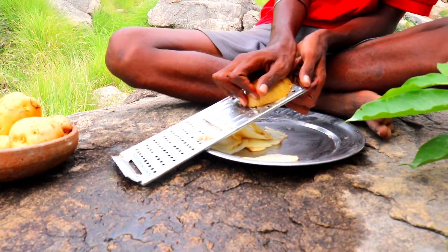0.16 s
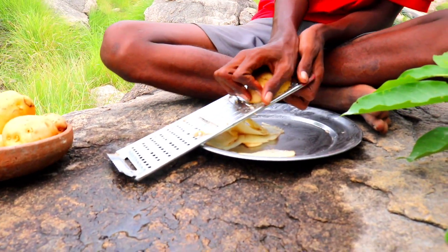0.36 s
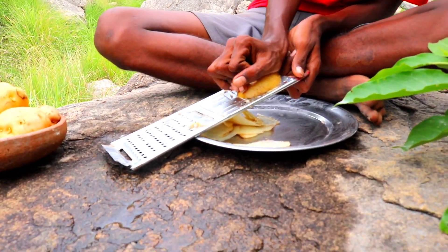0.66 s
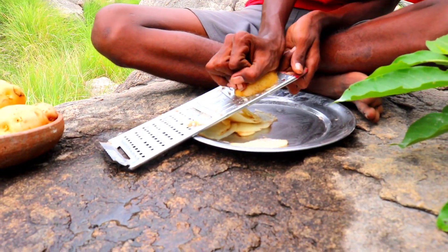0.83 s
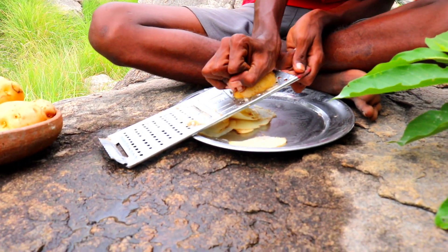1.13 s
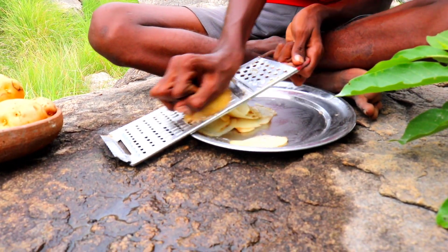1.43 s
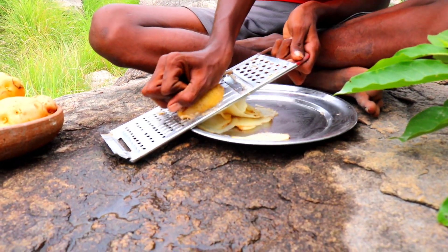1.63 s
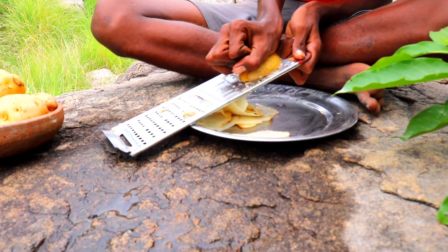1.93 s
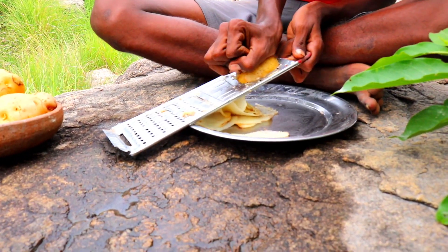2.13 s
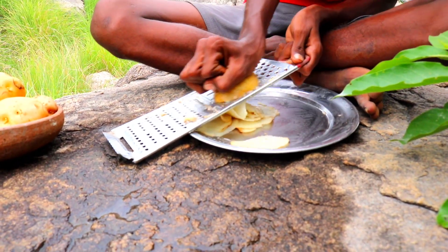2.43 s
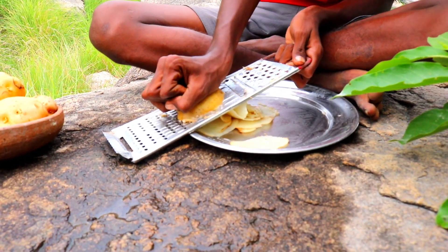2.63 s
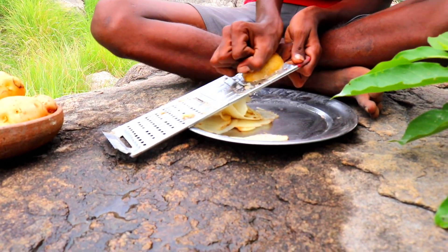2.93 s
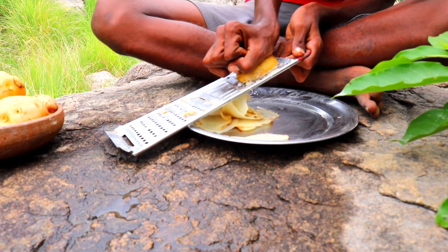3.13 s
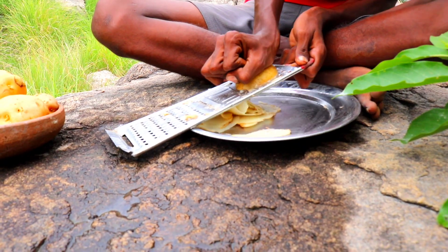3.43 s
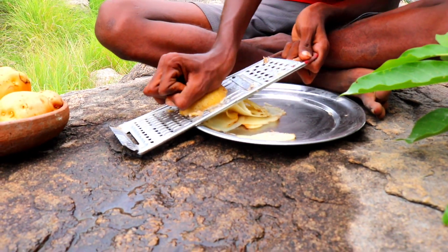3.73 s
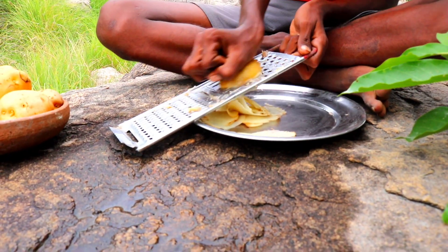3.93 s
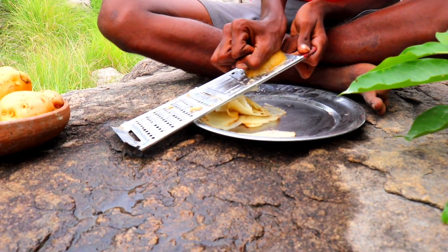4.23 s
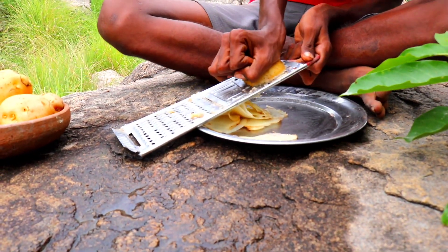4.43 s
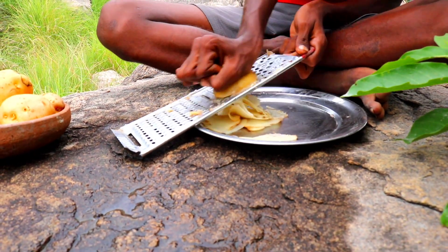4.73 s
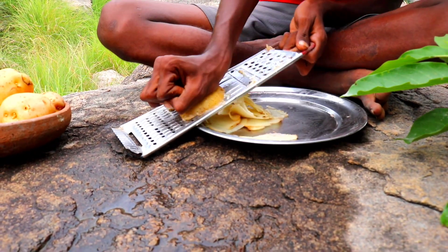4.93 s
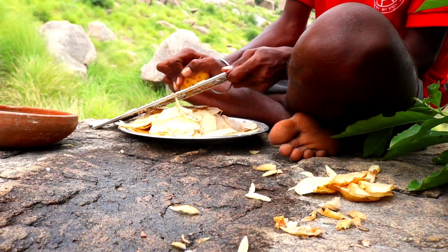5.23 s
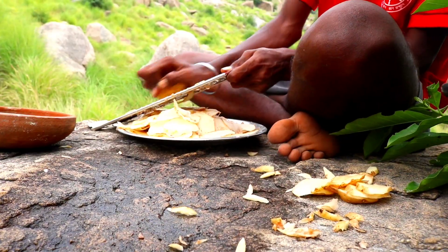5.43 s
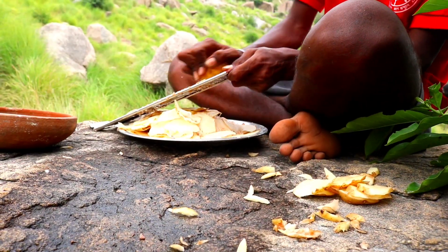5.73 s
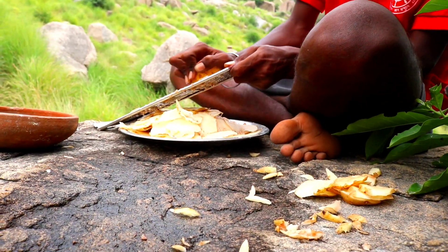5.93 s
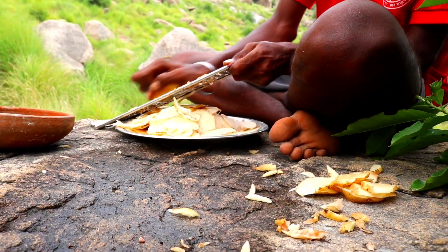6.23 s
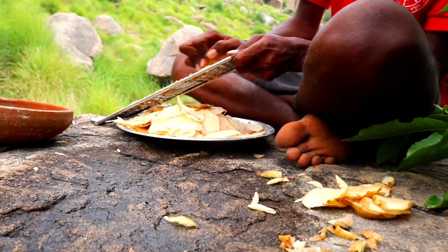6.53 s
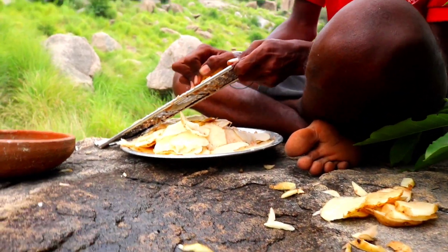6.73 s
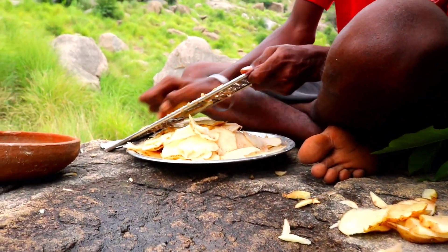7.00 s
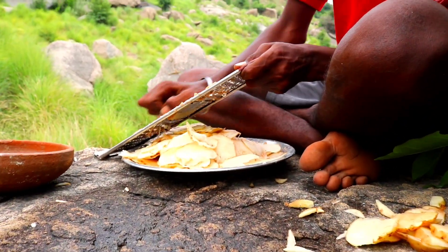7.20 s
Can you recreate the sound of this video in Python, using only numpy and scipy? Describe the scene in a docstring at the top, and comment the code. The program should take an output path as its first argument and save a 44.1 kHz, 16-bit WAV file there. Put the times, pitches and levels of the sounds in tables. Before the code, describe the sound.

Uneven slicing strokes on thin punched steel, about one a second, each leaning in, biting with a crunchy tear and sliding back with a ringing rub. Hard metallic clanks and short rattles from the plate dominate until about five seconds. Then a momentary dropout and a change to damped, moist slicing over a heap, with crisp snaps, dull hand bumps, rock ticks and a light low breeze. Close microphone, open air, no echo.

```python
"""A potato is sliced on a steel slicer that leans across a metal plate on a rock outdoors.
The blade bursts cells as filtered grains; rubs over the punched holes ring the sheet and squeak.
The slicer knocks and chatters on the plate as decaying modes, and torn flesh snaps as noise and plucked modes.
After a moment of silence the slicing goes on over a heap of slices, with wet slides and no more clatter.
Foot taps, hand bumps, faint smacks, open air, a later breeze and a far bird fill in as shaped noise and tones."""
import sys
import numpy as np
from scipy import signal
from scipy.fft import rfft, irfft, next_fast_len
from scipy.io import wavfile
from scipy.ndimage import uniform_filter1d, map_coordinates

SR = 44100
rng = np.random.default_rng(int(sys.argv[2]) if len(sys.argv) > 2 else 0)


def store_pcm(level_fs):
    """Save levels as 16-bit WAV."""
    pcm = np.round(np.clip(level_fs, -1, 1) * 32767).astype(np.int16)
    wavfile.write(sys.argv[1], SR, np.atleast_2d(pcm).T)


N = 324576
TIME = np.arange(N) / SR

# moment of silence: start_s, end_s
SILENCE_S = (5.147, 5.171)
# slicer knocks on the plate, then chatters; body and edge relative to the knock:
# start_s, level_db, body_db, edge_db, main_ring_hz, chatter_db, chatter_s
KNOCKS = [(0.5106, -14, -13, -3.5, 1380, -23, 0.021), (1.7602, -2.5, -33, -30, 1526, -16.5, 0.011),
          (1.9521, -3.5, -20.5, -21, 1487, -23.5, 0.053), (2.2094, -13.5, -15, -22, 1430, -27, 0.01),
          (2.2698, -13, -12, -10, 1470, -27, 0.022), (2.4994, -3, -29, -14, 1630, -12.5, 0.023),
          (2.612, -21, -8, -16, 1490, -29, 0.041), (2.7048, -11.5, -32, -37, 1690, -28, 0.0075),
          (2.796, -15.5, -17, -10, 1400, -33, 0.073), (2.8553, 3, -29, -19.5, 1540, -16.5, 0.046),
          (3.2969, -23.5, -10.5, -0.5, 1530, -35, 0.093), (3.3709, -11.5, -11.5, -25, 1490, -28.5, 0.033),
          (3.6075, 4, -27.5, -14, 1527, -21.5, 0.071), (3.7347, 0.5, -24.5, -17, 1545, -17.5, 0.075),
          (3.8938, 0, -21, -21, 1535, -12.5, 0.041), (4.4572, -23, -7, -0.5, 1480, -35.5, 0.034),
          (4.493, -24, -13, -15, 1490, -29, 0.095), (4.532, -16, -16, -14, 1640, -24, 0.037),
          (4.649, -30.5, -7, -29, 1650, -45, .012), (4.8982, -3.5, -22, -12.5, 1650, -27, 0.13),
          (4.982, -3, -17.5, -14, 1385, -17, .01), (4.9906, -10, -31, -25, 1510, -22.5, 0.064),
          (5.0809, -10.5, -17.5, -13, 1550, -25.5, 0.011)]
# colour of steel on plate: hz, level_db
CLATTER = [(40, -78), (120, -28), (200, -11.5), (310, -21.5), (450, -2), (700, -28), (1200, -13.5),
           (1480, 7.5), (1800, -5.5), (2200, 1), (2600, -4.5), (3700, -23.5), (7200, -35), (15000, -85)]
# colour of tearing, wet flesh: hz, level_db
CRISP = [(180, -76), (300, -14.5), (1140, -6.5), (1560, 0.5), (2320, 3.5), (3030, -1), (3400, -3),
         (4590, -1), (5160, -5), (5700, 1), (9550, -2), (16000, -11)]
# resonances of the thin sheet and punched edges: hz, width_hz, level_db
SHEET = [(563, 10, 1), (887, 13, -1.5), (1569, 19, 14), (1690, 90, -26), (3520, 23, 2), (4307, 74, 17),
         (4730, 300, 4), (5110, 46, 18.5), (6500, 55, 11.5), (6270, 45, 9.5), (6950, 93, 14.5),
         (7710, 25, 15.5), (9570, 40, 12)]
# left-right correlation: hz, correlation
ALIKE = [(100, 0.99), (500, 1), (1200, 0.84), (2200, 0.58), (3500, 0.39), (6000, 0), (12000, 0.017)]


def amp(db):
    """Decibels to gain."""
    return 10 ** (np.asarray(db) / 20)


def unit(x):
    """Scale to rms 1."""
    return x / np.sqrt(np.mean(x ** 2) + 1e-20)


def peaked(x):
    """Scale to peak 1."""
    return x / np.abs(x).max()


def dying(t, t60_s):
    """Exponential decay, 60 dB down after t60_s."""
    return amp(-60 * t / t60_s)


def ramp(t, length_s):
    """Smooth step from 0 at t = 0 to 1 at t = length_s."""
    return np.sin(np.pi / 2 * np.clip(t / length_s, 0, 1)) ** 2


def add(track, start_s, sound):
    """Mix a sound in at start_s, cut off at the end of the track."""
    room = track[:, round(start_s * SR):][:, :sound.shape[-1]]
    room += sound[..., :room.shape[1]]


def along(points, hz):
    """Interpolate (hz, value) points on a log frequency axis."""
    f, v = np.transpose(points)
    return np.interp(np.log(hz + 1), np.log(f + 1), v)


def filtered(x, response):
    """Multiply the spectrum of x by a response of frequency."""
    size = x.shape[-1]
    padded = next_fast_len(size + 8192)
    spectrum = rfft(x, padded) * response(np.fft.rfftfreq(padded, 1 / SR))
    return irfft(spectrum, padded)[..., :size]


def coloured(x, colour, size=2048):
    """Minimum-phase filter with the given (hz, level_db) shape, from its folded cepstrum."""
    cepstrum = irfft(np.log(amp(along(colour, np.fft.rfftfreq(size, 1 / SR)))))
    cepstrum[1:size // 2] *= 2
    cepstrum[size // 2 + 1:] = 0
    impulse = irfft(np.exp(rfft(cepstrum)))
    return signal.fftconvolve(x, impulse[None], axes=1)[:, :x.shape[1]]


def resonances(modes, f):
    """Causal response of (hz, width_hz, level_db) resonances."""
    return sum(amp(db) * 1j * f * w / (c * c - f * f + 1j * f * w) for c, w, db in modes)


def thin(x):
    """High-pass at 150 Hz: the knocks, chatter and snaps carry no deep bass."""
    return signal.sosfilt(signal.butter(3, 150, "high", fs=SR, output="sos"), x)


def noise(size, alike=ALIKE):
    """White stereo noise with a left-right correlation set over frequency by mixing mid and side."""
    def mid_side_gains(hz):
        turn = np.arccos(np.clip(along(alike, hz), -1, 1)) / 2
        return np.array([np.cos(turn), np.sin(turn)])
    mid, side = filtered(rng.standard_normal((2, size)), mid_side_gains)
    return np.array([mid + side, mid - side])


def grains(rate_hz, life_s, spread_db, alike=ALIKE):
    """Random noise bursts of random size; the power of each falls to 1/e in life_s."""
    kicks = (rng.random(N) < rate_hz / SR) * amp(spread_db * rng.standard_normal(N)) ** 2
    power = signal.lfilter([1], [1, -np.exp(-1 / (life_s * SR))], kicks)
    return unit(noise(N, alike) * np.sqrt(power))


def crackle(rate_hz):
    """Single sharp clicks as the coarser fibres part, each decaying with a 0.4 ms time constant."""
    clicks = 1.0 * (rng.random(N) < rate_hz / SR)
    envelope = signal.lfilter([1], [1, -np.exp(-1 / (.0004 * SR))], clicks)
    return unit(noise(N) * envelope)


def shifting(x, depth_db):
    """The colour shifts in patches as the potato covers different parts of the sheet."""
    z = signal.stft(x, nperseg=512)[2]
    field = uniform_filter1d(rng.standard_normal(z.shape[1:]), size=4, axis=0)  # across frequency
    field = uniform_filter1d(field, size=12, axis=1)  # across time
    return unit(signal.istft(z * amp(depth_db * unit(field)), nperseg=512)[1][:, :N])


def wobble(rate_hz):
    """A smooth random curve through rate_hz knots a second."""
    return map_coordinates(rng.standard_normal(N // 50), [TIME * rate_hz])


def swells(rows):
    """Gain over time from bell-shaped (centre_s, level_db, sigma_s) swells."""
    return sum(amp(db) * np.exp(-.5 * ((TIME - s) / sigma) ** 2) for s, db, sigma in rows)


def presses(rows):
    """Gain of (peak_s, level_db, rise_s, fall_s) rubs that swell to their hardest press and fade."""
    swell_db = 28  # gained over rise_s, lost over fall_s
    gains = []
    for s, db, rise, fall in rows:
        distance = np.maximum((s - TIME) / rise, (TIME - s) / fall).clip(0, 10)
        gains.append(amp(db - swell_db * distance))
    return np.max(gains, axis=0)


def outdoors():
    """Still open air as coloured noise; after the silence a low breeze of noise lumps gusts once."""
    # colour of the open air: hz, level_db
    air_colour = [(15, -63), (25, -10), (157, -1.5), (489, -5), (545, -3), (695, -6), (775, -7), (1290, -7),
                  (1610, -8), (1790, -7.5), (2000, -10), (3160, -13.5), (4370, -14.5), (16000, -27)]
    # gust: centre_s, level_db, sigma_s
    gust = [(5.26, -45.5, 0.11)]
    air_db, later_air_db, breeze_db = -48, -47.5, -57.5
    air = unit(coloured(noise(N, [(50, 0.71), (400, 0.6), (2000, 0.057), (8000, 0.14)]), air_colour, size=8192))
    lumps = grains(rate_hz=110, life_s=.02, spread_db=1.5, alike=[(100, .3)])
    rumble_colour = [(20, -31), (60, 2.5), (100, 1.5), (150, -4), (220, -7.5), (500, -31)]
    rumble = unit(coloured(lumps, rumble_colour, size=8192))
    later = TIME > SILENCE_S[1]
    breeze = amp([[-4], [2]]) * rumble * later * (amp(breeze_db) + swells(gust))
    return air * amp(np.where(later, later_air_db, air_db)) + breeze


def bird():
    """A far bird gives two faint, slightly falling whistles: sines gliding down."""
    # whistles: centre_s, level_db
    chirps = [(0.753, -50), (1.124, -45.5)]
    pitch_hz, fall_hz_per_s, sigma_s = 1790, 2800, .016
    out = 0
    for s, db in chirps:
        t = TIME - s
        out = out + swells([(s, db, sigma_s)]) * np.sin(2 * np.pi * (pitch_hz - fall_hz_per_s * t / 2) * t)
    return out


def ticking():
    """The wet potato gives faint smacks under the fingers even between strokes: sparse noise grains."""
    smacks = grains(rate_hz=10, life_s=.005, spread_db=2.5)
    return amp(-60.5) * unit(coloured(smacks, CRISP))


def bumping():
    """Dead contacts of a few cycles: a tick from the foot on the rock, a low push from the hand."""
    # slicer's foot on the rock: start_s, level_db, pitch_hz
    taps = [(5.813, -23, 1430), (6.706, -20.5, 3050), (6.818, -15.5, 2660), (6.8214, -22, 2640),
            (6.825, -19.5, 2230), (6.8694, -17, 1560)]
    # soft bumps of the hand on the slicer: start_s, level_db
    bumps = [(5.812, -30), (6.51, -37), (6.821, -32), (6.869, -12.5)]
    grit_colour = [(600, -7), (1500, -8), (4200, -3), (6000, -23)]
    out, t = np.zeros((2, N)), np.arange(SR // 10) / SR

    def thud(hz, decay_s):
        return peaked(t ** 2 * np.exp(-t / decay_s) * np.sin(2 * np.pi * hz * t))

    for s, db, hz in taps:
        grit = peaked(coloured(noise(len(t)) * dying(t, 0.018), grit_colour))
        tap = peaked(thud(hz, decay_s=0.0004) + amp(1.5) * grit)
        add(out, s, amp(db) * amp([[-2], [1]]) * tap)
    for s, db in bumps:
        add(out, s, amp(db) * amp([[-6], [3]]) * thud(hz=400, decay_s=0.00064))
    return out


def ring(t, scatter_db, spread_rad):
    """Steel modes; every contact draws new strengths, tunings and phases, the phases per channel."""
    # slicer and plate together, before any further damping by the caller: hz, level_db, t60_s
    steel_modes = [(404, -33, 0.12), (417, -36, 0.035), (542, -19, 0.043), (787, -5, 0.54), (960, -8, 0.29),
                   (974, -29, .2), (1054, 17, 0.052), (1340, 6, 0.088), (1481, 25, 0.53), (1507, 17, 0.23),
                   (1672, 16.5, 0.2), (2060, 26, 0.18), (2130, 11.5, 0.15), (2553, 17, 0.18),
                   (2544, -10, 0.11), (3340, 2.5, 0.15)]
    detune = .012  # relative, standard deviation
    hz, db, t60 = np.transpose(steel_modes)[:, :, None]
    hz = hz * (1 + detune * rng.standard_normal(hz.shape))
    strength = amp(db + scatter_db * rng.standard_normal(hz.shape) - 60 * t / t60)
    phase = spread_rad * np.sqrt(hz / hz.max()) * rng.standard_normal((2, len(hz), 1))
    return (strength * np.sin(2 * np.pi * hz * t + phase)).sum(axis=1)


def skidding():
    """After a knock a quick irregular train of tiny blows keeps the steel ringing."""
    rise_s, sag_db, dies_db_per_s = 0.012, 5.5, 525  # builds up, sags over its length, dies away
    tone_db, rattle_db = -2, -7  # ringing modes, dry rattle
    blows = shifting(grains(rate_hz=700, life_s=.0009, spread_db=3), depth_db=2.5)
    rattle = unit(coloured(blows, CLATTER))
    out, t = np.zeros((2, N)), np.arange(SR // 4) / SR
    for s, *_, db, length in KNOCKS:
        part = round(s * SR) + np.arange(len(t))
        steel = ring(t, scatter_db=2.5, spread_rad=.45) * dying(t, .12)
        tone = unit(signal.fftconvolve(blows[:, part], steel, axes=1)[:, :len(t)])
        loss_db = sag_db * np.minimum(t / length, 1) + dies_db_per_s * np.maximum(t - length, 0)
        chatter = amp(tone_db) * tone + amp(rattle_db) * rattle[:, part]
        add(out, s, ramp(t, rise_s) * amp(db - loss_db) * chatter)
    return out


def knocking():
    """Each blow is a hard clack with rebounds, a buzz and a short ring pitched by the point of contact."""
    # colour of the bright edge: hz, level_db
    edge_colour = [(1500, -43), (2800, 3), (4500, 8), (7000, 7), (10000, -2.5), (15000, -46)]
    body_colour = [(40, -43), (220, -20.5), (520, 9.5), (700, -1), (1500, -33)]
    edge_rise_s = 0.0016  # wet flesh softens the start
    steel_db, main_db, buzz_db = -4, -13, -9
    partner_ratio = 1.43  # second tone over the main ring
    out, t = np.zeros((2, N)), np.arange(SR // 5) / SR
    for s, db, body_db, edge_db, hz, *_ in KNOCKS:
        contacts = np.zeros((2, len(t)))
        gaps_s = rng.uniform(.0011, .0022, size=6)
        contact_s = np.cumsum(gaps_s) - gaps_s[0]
        contacts[:, np.round(contact_s * SR).astype(int)] = .68 ** np.arange(6)
        clack = peaked(coloured(contacts, CLATTER))
        buzz = peaked(coloured(noise(len(t)) * dying(t, .04), CLATTER))
        edge = peaked(coloured(noise(len(t)) * ramp(t, edge_rise_s) * dying(t, 0.086), edge_colour))
        body = peaked(coloured(noise(len(t), [(400, 0.98)]) * dying(t, 0.094), body_colour))
        steel = peaked(ring(t, scatter_db=3, spread_rad=.5) * dying(t, .2))
        main = np.sin(2 * np.pi * hz * t) + np.sin(2 * np.pi * partner_ratio * hz * t)
        main = main * dying(t, .05)
        metal = peaked(clack + amp(steel_db) * steel + amp(main_db) * main + amp(buzz_db) * buzz)
        add(out, s, amp(db) * (metal + amp(edge_db) * edge + amp(body_db) * body))
    return np.tanh(out)  # the hardest blows saturate


def snapping():
    """Flesh catches and tears off a steel edge with a bright crackle and plucks the sheet's modes."""
    # snaps: start_s, level_db, crackle_t60_s
    snaps = [(0.5112, -26.5, 0.57), (0.6569, -26, 0.081), (0.7721, -28, 0.075), (0.8539, -26.5, 0.12),
             (0.9298, -28, 0.037), (0.9727, -22, 0.11), (1.4484, -9.5, 0.047), (1.493, -8.5, 0.068),
             (1.5148, -10, 0.032), (1.5623, -19.5, 0.15), (1.827, -26, 0.12), (2.0683, -21, 0.094),
             (2.0765, -17, 0.045), (2.2468, -16.5, 0.16), (2.8866, -16.5, 0.093), (3.689, -8.5, 0.14),
             (3.9636, -24, 0.077), (4.458, -27, 0.6), (4.6943, -22, 0.066), (4.7165, -25, 0.023),
             (4.7375, -14.5, 0.033), (4.8968, -4.5, 0.024), (4.932, -19, 0.052), (5.0788, -11, 0.028),
             (5.1883, -12.5, 0.16), (5.5214, -11.5, 0.063), (5.5883, -20.5, 0.12), (5.6405, -26, 0.17),
             (5.871, -26.5, 0.15), (6.001, -18.5, 0.048), (6.304, -14, 0.027), (6.7573, -15, 0.05),
             (7.087, -14, 0.17), (7.1505, -12, 0.027)]
    pan_db = 1.3  # L-R
    out, t = np.zeros((2, N)), np.arange(SR // 6) / SR
    hz, width, level = np.transpose(SHEET)[:, :, None]
    for s, db, t60 in snaps:
        burst = noise(len(t)) * dying(t, t60) * (1 - np.exp(-t / 0.0012))
        phase = hz / 3000 * rng.standard_normal((2, len(hz), 1))  # high modes differ most between channels
        modes = amp(level) * np.exp(-np.pi * width * t) * np.sin(2 * np.pi * hz * t + phase)
        pluck = unit(modes.sum(axis=1))
        pluck_db = -2 if s < SILENCE_S[0] else -9  # the heap of slices damps the sheet later on
        snap = peaked(unit(coloured(burst, CRISP)) + amp(pluck_db) * pluck)
        add(out, s, amp(db) * amp([[pan_db / 2], [-pan_db / 2]]) * snap)
    return out


def sliding():
    """The wet cut face squelches and ticks over the heap while the hand shifts its grip in low rustles."""
    # wet slides: peak_s, level_db, rise_s, fall_s
    slides = [(5.192, -30.5, 0.036, 0.054), (5.824, -29, 0.024, 0.052), (6.02, -32.5, 0.13, 0.04),
              (6.5, -37.5, 0.14, 0.16), (6.62, -39, 0.16, 0.073), (6.757, -35.5, 0.19, 0.18),
              (7.21, -35, 0.067, 0.081), (7.272, -28.5, 0.074, 0.078)]
    # grip rustles: centre_s, level_db, sigma_s
    grips = [(5.825, -44, 0.0055), (6.32, -45, 0.023), (6.51, -40.5, 0.031)]
    # colour of the wet face: hz, level_db
    wet_colour = [(180, -9), (300, -8), (994, -9.5), (1610, -1.5), (2480, -3), (2980, 3.5), (3640, -4.5),
                  (9710, -8), (14200, -17), (16000, -34)]
    grains_wet = grains(rate_hz=3600, life_s=0.0086, spread_db=4.5)
    wet = shifting(grains_wet, depth_db=3) + amp(-5.5) * crackle(rate_hz=220)
    grip = unit(coloured(noise(N), [(60, -15), (200, 2), (550, 0.5), (800, -5), (1500, -35)]))
    return presses(slides) * unit(coloured(wet, wet_colour)) + swells(grips) * grip * amp([[-3], [1]])


def squeaking():
    """At a hard press the potato sticks and slips at one pitch, and the punched edges sing along."""
    # squeaks: centre_s, level_db, sigma_s, pitch_hz
    squeaks = [(0.515, -29, 0.0037, 5160), (0.932, -22.5, 0.0029, 5210), (0.976, -34, 0.0071, 3430),
               (3.058, -28.5, 0.0063, 5100), (3.149, -19, 0.01, 4960), (4.207, -30.5, .008, 1830),
               (4.213, -28, 0.01, 4600), (4.315, -26, 0.0089, 3320)]
    # resonances of the punched edges: hz, width_hz, level_db
    tines = [(4220, 44, -7), (4800, 150, -1), (5260, 36, -3)]
    width_hz, tines_db = 30, -1
    out, t = np.zeros((2, N)), np.arange(-SR // 10, SR // 10) / SR
    for s, db, sigma, hz in squeaks:
        slips = noise(len(t), [(2000, 0.56), (5000, -0.89)])
        note = unit(filtered(slips, lambda f: resonances([(hz, width_hz, 0)], f)))
        edges = unit(filtered(slips, lambda f: resonances(tines, f)))
        add(out, s + t[0], amp(db) * np.exp(-.5 * (t / sigma) ** 2) * (note + amp(tines_db) * edges))
    return out


def rubbing():
    """Stick and slip as the potato is drawn back over the punched holes rings the sheet."""
    # rubs: peak_s, level_db, rise_s, fall_s
    rubs = [(.932, -29, 0.031, 0.042), (.978, -34.5, 0.06, 0.05), (1.745, -31, 0.062, 0.042),
            (1.952, -33, 0.16, 0.078), (2.255, -34.5, 0.0082, 0.21), (2.31, -33.5, 0.049, 0.088),
            (3.066, -32.5, 0.15, 0.15), (3.15, -33.5, 0.054, 0.076), (3.32, -33.5, 0.015, 0.12),
            (3.395, -31, 0.07, 0.057), (4.08, -47, .06, 0.21), (4.206, -32, 0.07, 0.046),
            (4.31, -31.5, 0.072, 0.09)]
    # colour of the punched steel: hz, level_db
    punched_colour = [(200, -21), (550, -8), (1100, -16), (1800, -3.5), (2500, -4), (3300, -3.5),
                      (3800, -8), (4400, -14), (5300, -4), (5900, -2.5), (6500, -15), (8000, -9.5),
                      (11000, -11.5), (15500, -12)]
    slips = shifting(grains(rate_hz=1200, life_s=.002, spread_db=3.5), depth_db=2)
    sheet = unit(filtered(slips, lambda f: resonances(SHEET, f)))
    return presses(rubs) * (amp(2) * unit(coloured(slips, punched_colour)) + amp(-3.0) * sheet)


def pushes():
    """Gains of hiss and flesh: each stroke leans in, glides evenly and peaks where the blade bites."""
    # cutting strokes: start_s, length_s, glide_db, bite_after_s, bite_db, bite_width_s, flesh_over_hiss_db
    cuts = [(1.233, 0.386, -31.5, .275, -17.5, 0.0062, -1.5), (2.4, 0.3, -34, 0.083, -25.5, 0.017, 2.5),
            (3.398, 0.46, -37.5, 0.16, -27.5, 0.031, 1), (4.681, 0.38, -34.5, 0.1, -28, 0.034, 1.5),
            (5.413, 0.221, -36, 0.11, -31, 0.022, -3), (6.181, .25, -33.5, 0.1, -32.5, 0.011, -1),
            (6.921, 0.29, -32.5, 0.11, -27.5, 0.0083, 0)]
    push_s, first_touch_db = 0.056, 20.5  # starts this much lighter and leans in
    stop_s, flesh_lag_s, uneven_db = 0.08, 0.019, 1  # flesh gives way just after the bite
    hiss, flesh = np.zeros((2, N))
    for s, length, glide_db, after, bite_db, width, flesh_db in cuts:
        t = TIME - s
        moving = amp(first_touch_db * np.minimum(t / push_s - 1, 0)) * ramp(length - t, stop_s)

        def force(bite_s):
            return moving * (amp(glide_db) + amp(bite_db) * np.exp(-np.abs(t - bite_s) / width))

        hiss += force(after)
        flesh += amp(flesh_db) * force(after + flesh_lag_s)
    return np.array([hiss, flesh]) * amp(uneven_db * wobble(rate_hz=70))


def cutting():
    """The blade bursts cells and parts fibres; the heap of slices later damps the plate's colour."""
    # colours of blade hiss, flesh on the plate and flesh over the heap: hz, level_db
    hiss_colour = [(200, -83), (1500, -32), (3500, -4), (5000, 3), (7000, 2), (8000, 0.5), (10000, -1),
                   (13000, -9.5), (15000, -32), (16000, -36)]
    flesh_colour = [(40, -47), (150, -21), (300, -19.5), (500, -2.5), (700, -5), (900, 4), (1150, -6.5),
                    (1500, 7.5), (2200, 1), (3000, -1.5), (4000, -0.5), (7000, -6)]
    heap_colour = [(100, -12), (300, -36), (550, 3.5), (950, -8.5), (1300, 2.5), (1800, 6), (2800, 5),
                   (3800, 6), (5000, -4), (8000, -6.5)]
    cells = shifting(grains(rate_hz=1500, life_s=.0012, spread_db=3.5), depth_db=1.8)
    cells = cells + amp(-5) * crackle(rate_hz=200)
    hiss_gain, flesh_gain = pushes()
    hiss = unit(coloured(cells, hiss_colour)) * hiss_gain
    fibres = shifting(grains(rate_hz=510, life_s=0.0043, spread_db=1.5), depth_db=3.5)
    on_plate, on_heap = unit(coloured(fibres, flesh_colour)), unit(coloured(fibres, heap_colour))
    body = amp(2.5) * np.where(TIME < SILENCE_S[0], on_plate, on_heap)
    return hiss + body * flesh_gain


def scene():
    """All sources; all but the snaps lean right up to the low treble, left above, and lead on the left."""
    # left-right level difference: hz, l_minus_r_db
    lean = [(200, -0.5), (1000, -1.5), (2400, -3.5), (4000, 0.5), (8000, 2), (14000, 3)]
    lead_s = 2.5e-5
    potato = cutting() + rubbing() + squeaking() + sliding() + ticking()
    near = potato + thin(skidding() + knocking()) + bumping() + outdoors() + bird()

    def channels(hz):
        tilt_db = along(lean, hz)
        gain = amp(np.array([tilt_db, -tilt_db]) / 2)
        return gain * np.exp(1j * np.pi * lead_s * np.array([hz, -hz]))

    return filtered(near, channels) + thin(snapping())


def record(dry):
    """Drop out briefly with soft edges, clip just under full scale and remove the highest treble."""
    top_hz = 15900
    running = 1.0 * ((TIME < SILENCE_S[0]) | (TIME > SILENCE_S[1]))
    running = uniform_filter1d(running, size=200)
    return filtered(np.clip(dry * running, -.95, .95), lambda hz: hz < top_hz)


dry = scene()
out = record(dry)
store_pcm(out)
```